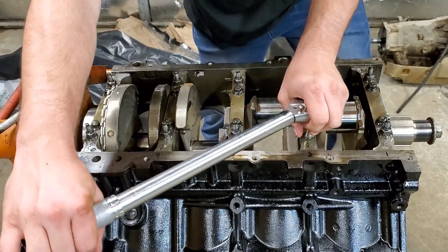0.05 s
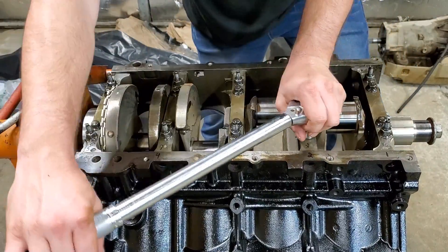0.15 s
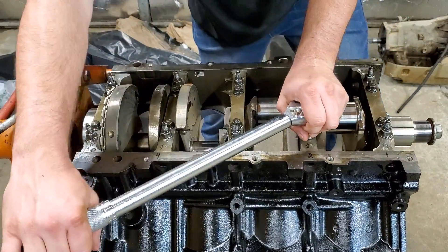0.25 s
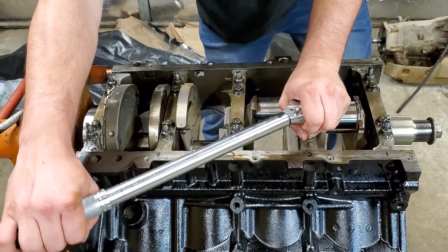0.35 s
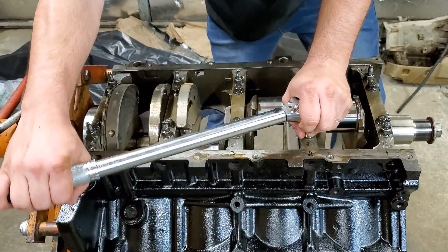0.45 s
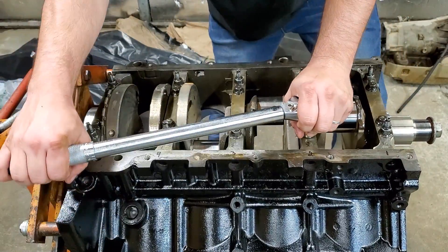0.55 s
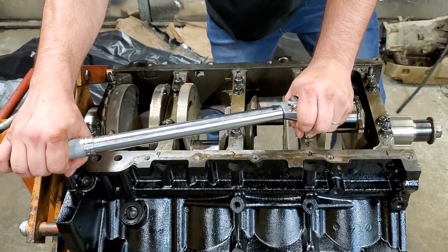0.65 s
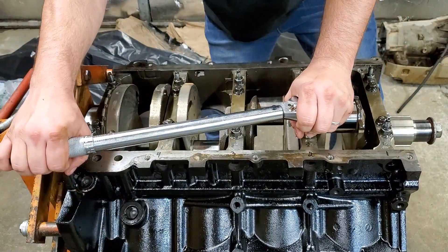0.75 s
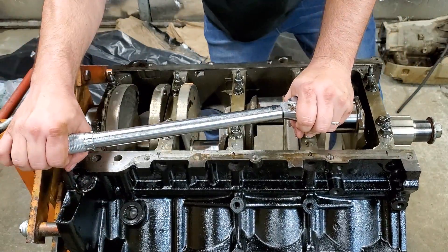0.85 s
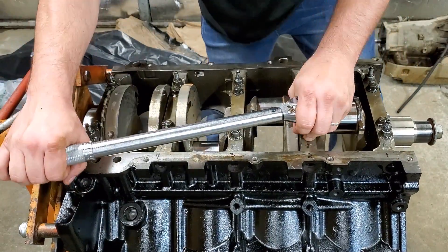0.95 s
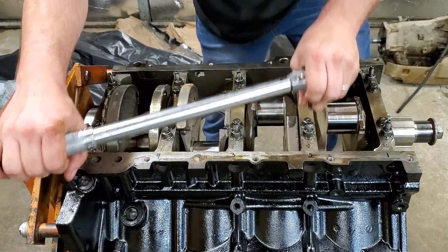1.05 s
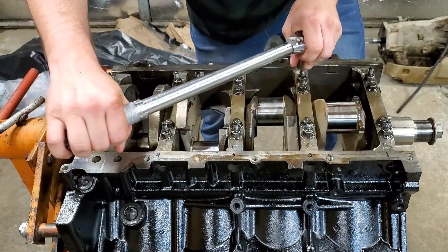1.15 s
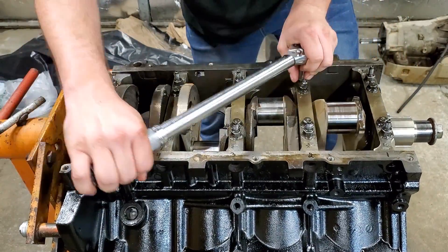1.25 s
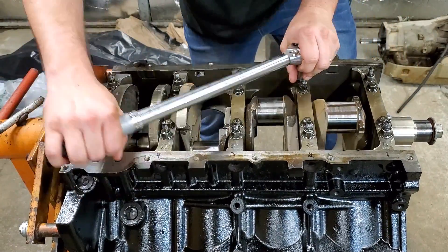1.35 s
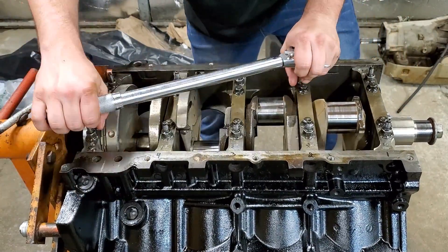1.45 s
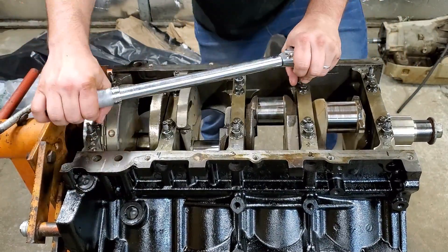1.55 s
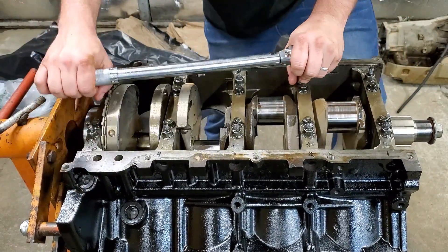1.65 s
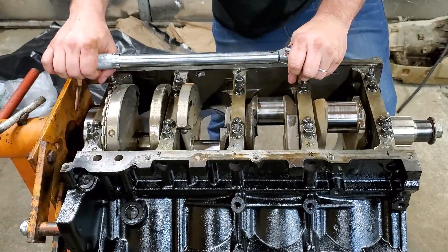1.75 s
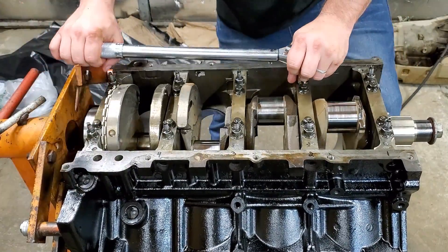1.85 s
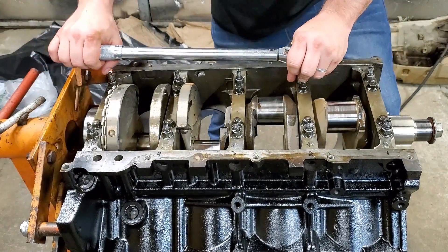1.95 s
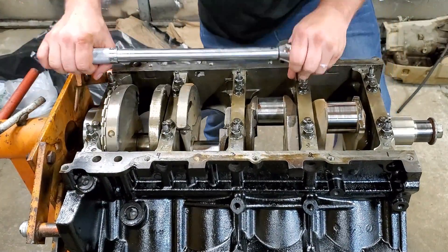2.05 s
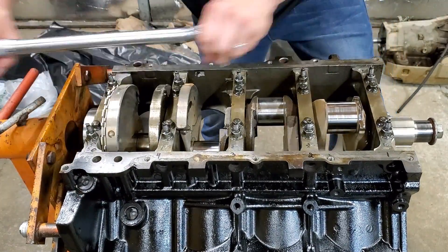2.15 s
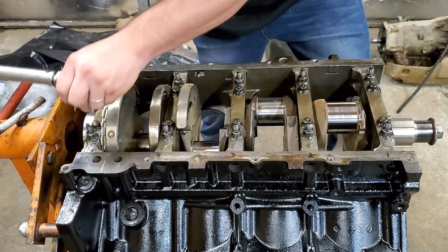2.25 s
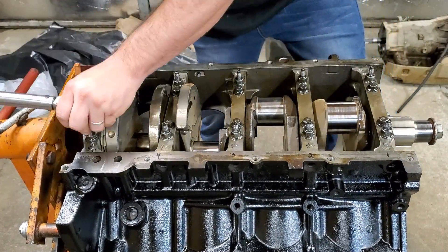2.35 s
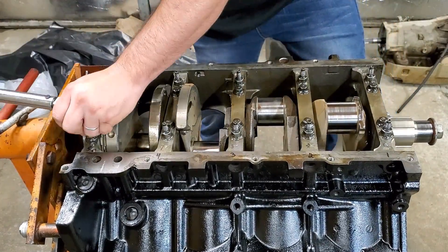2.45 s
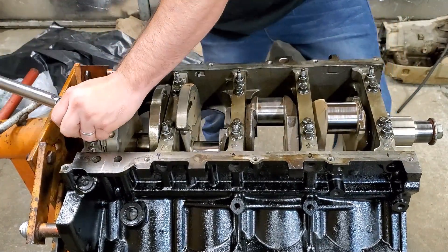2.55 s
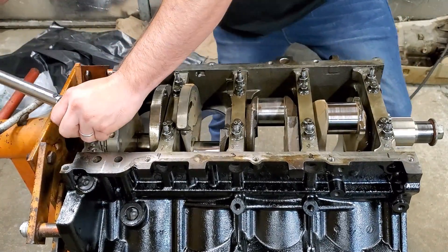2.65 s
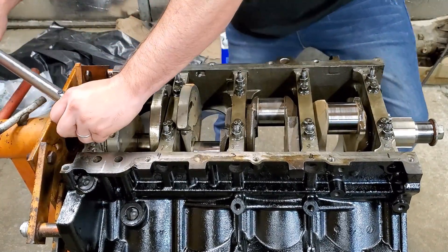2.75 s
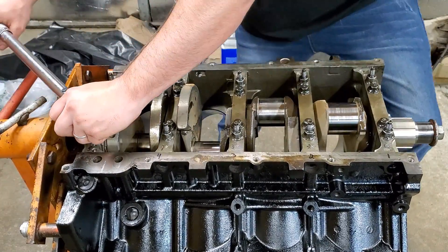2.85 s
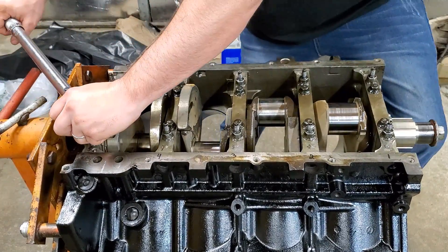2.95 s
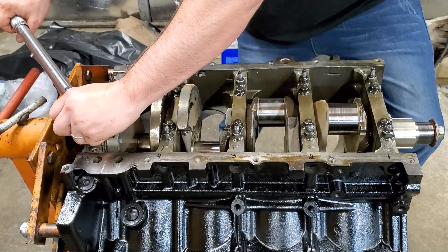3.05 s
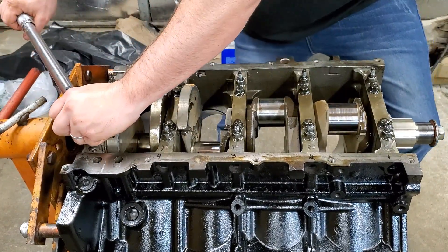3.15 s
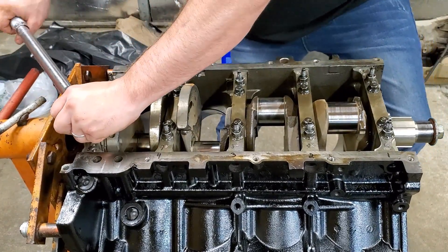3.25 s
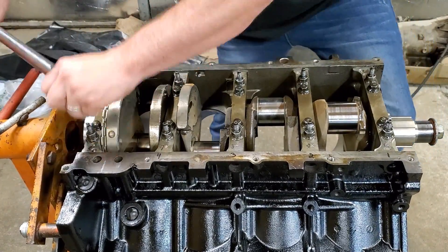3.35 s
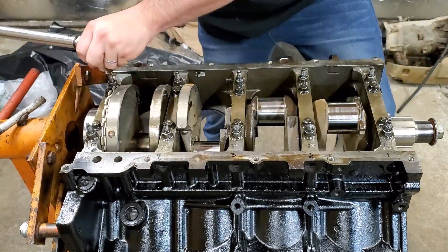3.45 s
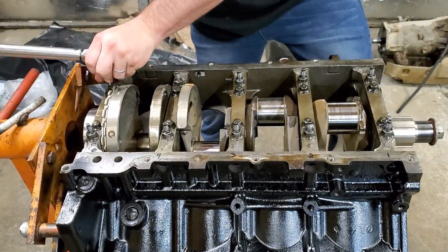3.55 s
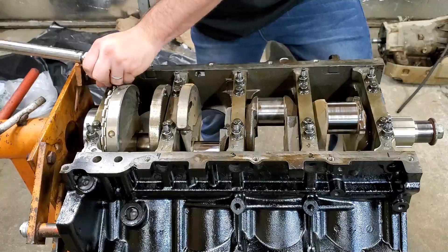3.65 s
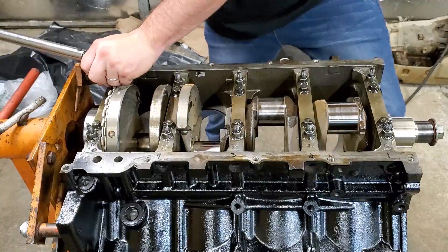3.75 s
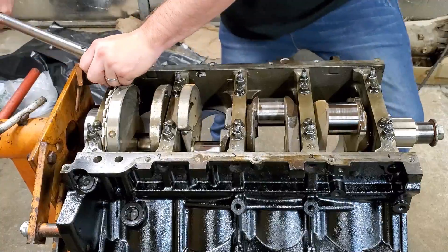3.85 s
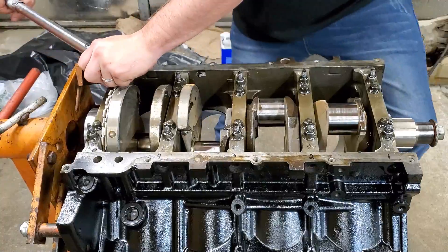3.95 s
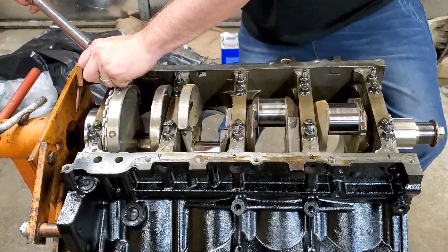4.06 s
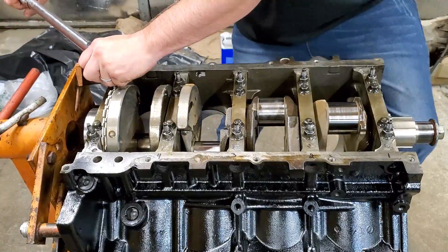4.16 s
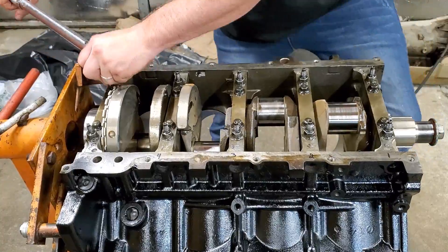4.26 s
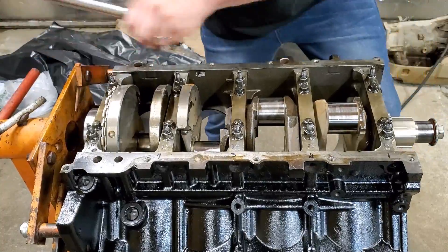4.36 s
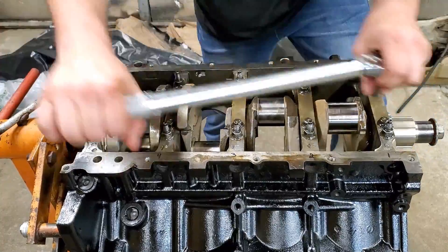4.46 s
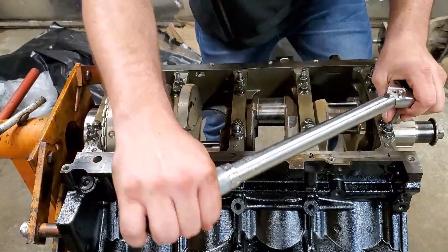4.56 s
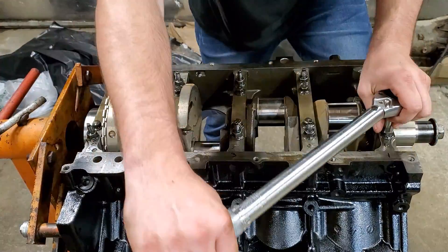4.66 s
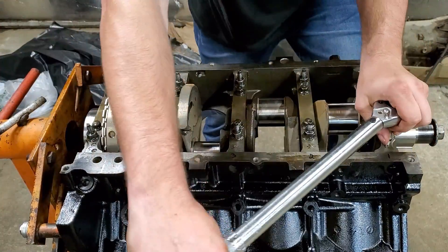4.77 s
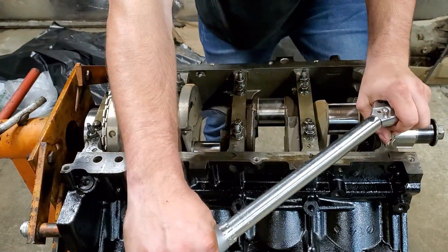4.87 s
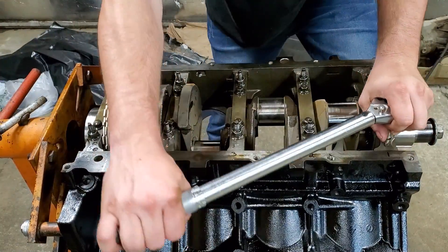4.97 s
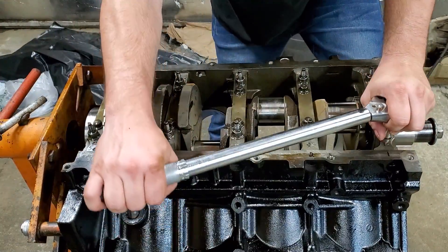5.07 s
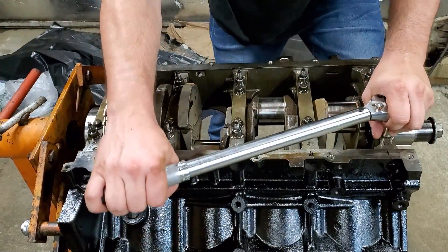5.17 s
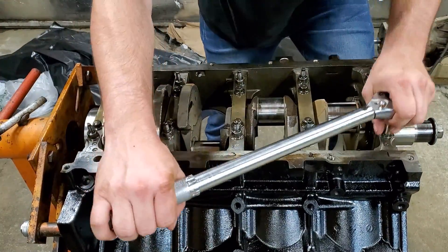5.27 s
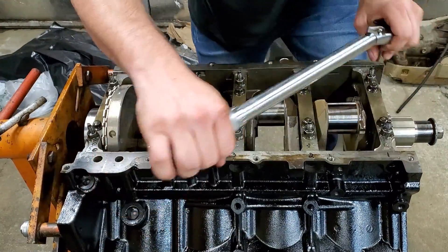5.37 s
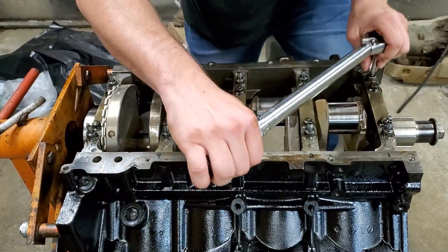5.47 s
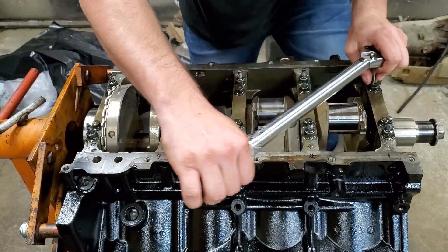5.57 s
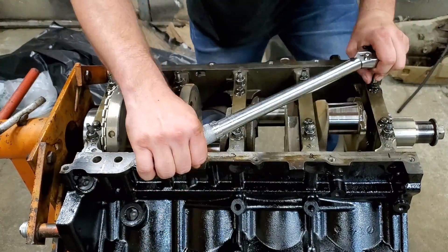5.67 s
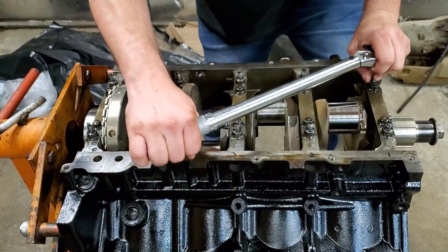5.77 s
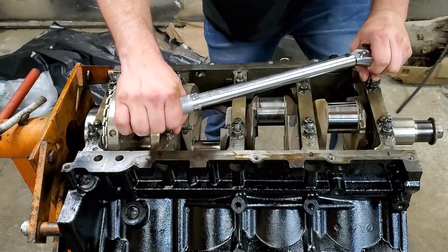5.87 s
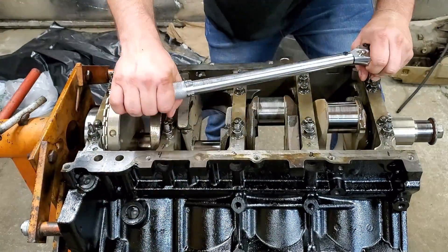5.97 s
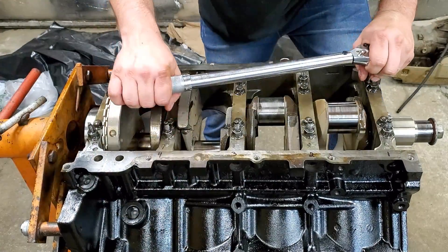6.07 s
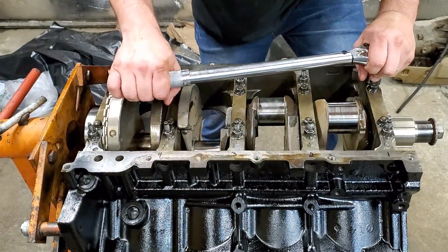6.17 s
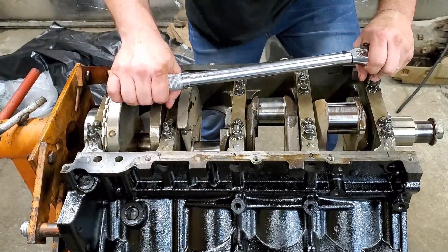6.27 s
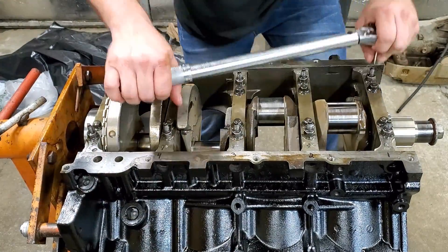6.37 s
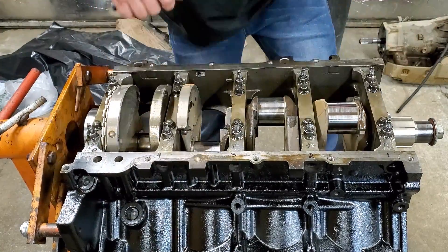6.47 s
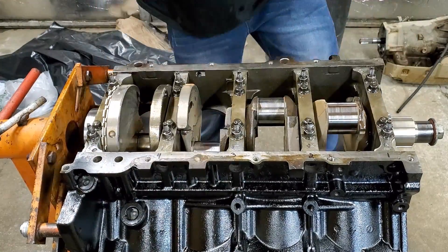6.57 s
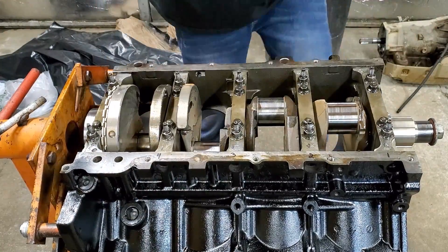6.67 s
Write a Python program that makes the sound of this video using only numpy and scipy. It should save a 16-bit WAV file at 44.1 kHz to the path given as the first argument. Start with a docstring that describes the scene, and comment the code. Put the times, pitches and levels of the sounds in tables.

```python
"""Torque wrench on an engine block

A click-type torque wrench checks six bolts, close by in a quiet garage. On each bolt it breaks over with
a loud click and ticks back as the pull eases: noise bursts through steel resonances, with a hum of decaying
sines for the tube. Then the socket is lifted off and rattles onto the next bolt in clusters of small strikes.
Dull block thuds are band-passed noise; hands and clothes rub faintly over a low room rumble, both shaped noise."""
import sys
import numpy as np
from scipy import signal
from scipy.fft import rfft, irfft
from scipy.io import wavfile
from scipy.ndimage import uniform_filter1d

SR = 44100
rng = np.random.default_rng(int(sys.argv[2]) if len(sys.argv) > 2 else 0)


def persist_wave(psi):
    """Save psi, clipped to +-1, as 16-bit WAV."""
    counts = np.round(np.clip(psi, -1, 1) * 32767).astype(np.int16)
    wavfile.write(sys.argv[1], SR, np.atleast_2d(counts).T)


N = 296352  # length [samples]

# Every source has two rows: the sum heard by both microphones, and unrelated reflections for their difference.


def gain_of(db):
    """Decibels to amplitude."""
    return 10 ** (np.asarray(db) / 20)


def evened(x):
    """Scales to rms 1."""
    return x / np.sqrt(np.mean(np.abs(x) ** 2) + 1e-20)


def read(points, hz):
    """Reads a table on a log-frequency axis."""
    f, value = np.transpose(points)
    return np.interp(np.log(hz + 1), np.log(f + 1), value)


def add(mix, s, sound):
    """Mixes a sound in at time s."""
    part = mix[:, max(round(s * SR), 0):][:, :sound.shape[-1]]
    part += sound[..., :part.shape[1]]


def noise(colour):
    """Two unrelated noises of one colour, rms 1 overall."""
    spectrum = rfft(rng.standard_normal((2, N)))
    hz = np.fft.rfftfreq(N, 1 / SR)
    return evened(irfft(spectrum * gain_of(read(colour, hz)), N))


def steel(colour, modes, s, body_db, treble_db, scatter_db=1.86, scatter_hz=140, size=12288):
    """Causal response of a steel part, unit power; each contact point favours other resonances."""
    # how freely the steel sings near 6.5 kHz as the bolts go by: (time [s], level [dB])
    singing = [(0.9, -8.5), (2.5, -0.5), (3.2, 13.5), (3.6, 2), (4.1, 3), (5.2, -3), (6.3, -6)]
    hz = np.fft.rfftfreq(size, 1 / SR)
    treble_shelf = read([(8800, 0), (12500, 1)], hz)
    body_shelf = read([(3800, 1), (5200, 0)], hz)
    db = read(colour, hz) + np.clip(treble_db, -8, 12) * treble_shelf + body_db * body_shelf
    # random ripple along the spectrum, one draw every scatter_hz
    db = db + scatter_db * np.interp(hz / scatter_hz, np.arange(256), rng.standard_normal(256))
    sung_mode = (6480, 230, np.interp(s, *np.transpose(singing)))
    for mode_hz, width, peak_db in [*modes, sung_mode]:
        db = db + peak_db / (1 + ((hz - mode_hz) / width) ** 2)
    log_gain = np.log(evened(gain_of(db)))
    mirrored = np.r_[log_gain, log_gain[-2:0:-1]]
    # minimum phase: the energy comes as early as this colour allows
    return np.exp(np.conj(signal.hilbert(mirrored)))[:len(hz)]


def strike(response, crack_db, ring_db, crack_s, clatter_db=-3, clatter_s=0.013, snap_db=3, size=12288):
    """Metal meets metal: a hard snap and crack, early reflections, then a dense ring with its own decay per band."""
    # how long the ring lasts among the block and the walls: (frequency [Hz], t60 [s])
    ring_t60 = [(300, 0.21), (1800, 0.16), (4000, 0.16), (7000, 0.14), (13000, 0.16), (18000, 0.18)]
    t = np.arange(size) / SR
    burst, clatter, wash = rng.standard_normal((3, 2, size))
    snap = gain_of(snap_db) * np.exp(-t / .0004)
    crack = rfft(burst * (np.exp(-t / crack_s) + snap))
    # a hard contact excites all pitches evenly
    crack = crack / np.sqrt(uniform_filter1d(np.abs(crack) ** 2, size=200))
    hz, age, z = signal.stft(wash, SR, nperseg=128)
    decay = gain_of(-60 * age / read(ring_t60, hz)[:, None])
    ring = signal.istft(z * decay, SR, nperseg=128)[1][:, :size]
    reflections = gain_of(clatter_db) * clatter * np.exp(-t / clatter_s)
    ring = (ring + reflections) * (1 - np.exp(-t / 0.00019))
    blow = gain_of(crack_db) * np.sqrt(crack_s * SR / 2) * crack + gain_of(ring_db) * rfft(ring)
    fade = np.clip(2 - 2.2 * t / t[-1], 0, 1)
    return irfft(blow * response, size) * fade


def pulls():
    """On each bolt the wrench breaks over loudly and ticks back as the pull eases."""
    # one break-over per bolt: (time [s], crack [dB], ring [dB], body tilt [dB], treble tilt [dB], tube [dB],
    # tube pitch factor set by the grip)
    releases = [(0.8984, -24.5, -33.5, -0.5, 4, -44.5, 1.05), (1.9298, -26.5, -31.5, -2, 3, -43, 1.014),
                (3.2231, -25, -31, 7.5, 6, -42.5, 1.02), (4.0947, -25.5, -29, 4.5, 7.5, -49, 1),
                (5.144, -24.5, -31.5, -0.5, 5, -44, 1.053), (6.264, -21.5, -34, -2.5, 1.5, -44.5, 1.012)]
    # the wrench ticks back: (time [s], crack level [dB], ring level [dB])
    eases = [(0.979, -39.5, -48.5), (2.0277, -46.5, -50.5), (3.3085, -34.5, -37.5), (4.1977, -39, -42.5),
             (5.237, -36.5, -45.5), (6.328, -41, -52.5)]
    # colours of the click and of the back tick: (frequency [Hz], level [dB])
    release_colour = [(150, -25.5), (500, -34), (900, -17), (1400, -15.5), (2700, -8), (4000, -15),
                      (5400, -5), (6400, 5), (8000, 1.5), (10000, -9), (13000, -1), (15500, -10.5),
                      (17000, -21)]
    reset_colour = [(150, -34), (500, -26.5), (900, -8), (1400, -14.5), (2600, -8), (4000, -8.5),
                    (6400, 0.5), (9000, -8), (12500, -2), (17000, -13)]
    # steel resonances of the wrench: (frequency [Hz], half width [Hz], level above the colour [dB])
    wrench_modes = [(1770, 160, 3), (2700, 160, 4), (3450, 70, 7), (6210, 70, 7), (6550, 30, 7),
                    (7250, 40, 5), (8740, 40, 4), (12280, 70, 3), (12732, 45, 7), (13200, 70, 7),
                    (14000, 120, 3)]
    # the back tick is a smaller break-over on the same bolt, duller and with a lower hum
    tick_body_db, tick_treble_db, tick_tube_db, tick_pitch = 2, -9.5, -54, 0.97
    tick_tilt_share = 0.25  # how much of the bolt's body tilt the back tick keeps
    out = np.zeros((2, N))
    for release, tick in zip(releases, eases):
        s, crack_db, ring_db, body_db, treble_db, tube_db, pitch = release
        response = steel(release_colour, wrench_modes, s, body_db, treble_db)
        hum = gain_of(tube_db) * tube(pitch)
        out += wrench(s, crack_db, ring_db, response, hum, crack_s=0.0036, slip_db=-13.5)
        tick_body = tick_tilt_share * body_db + tick_body_db
        response = steel(reset_colour, wrench_modes, s, tick_body, treble_db + tick_treble_db)
        hum = gain_of(tick_tube_db) * tube(pitch * tick_pitch)
        out += wrench(*tick, response, hum, crack_s=0.005, slip_db=-25.0)
    return out


def wrench(s, crack_db, ring_db, response, hum, crack_s, slip_db, slip_s=0.0012):
    """The pawl starts to slip, then the head snaps against the tube and sets it humming."""
    out = np.zeros((2, N))
    add(out, s - slip_s, strike(response, ring_db + slip_db, ring_db + slip_db, crack_s))
    add(out, s, strike(response, crack_db, ring_db, crack_s))
    add(out, s, hum)
    return out


def tube(pitch, sag=0.18, sag_s=0.0036):
    """The hollow handle swells into a short hum near 1 kHz that sags as the load lets go."""
    # modes of the handle: (frequency [Hz] before the grip's factor, level [dB], rise [s], t60 [s])
    tube_modes = [(1042, 12.5, 0.013, 0.098), (963, -0.5, 0.0058, 0.15), (1124.3, -32, 0.024, 0.24),
                  (1010, -15, 0.0035, 0.31)]
    t = np.arange(SR // 2) / SR
    hum = np.zeros((2, len(t)))
    sagging_time = t - sag * sag_s * np.exp(-t / sag_s)  # starts sharp by the share sag, then settles
    for hz, db, rise, t60 in tube_modes:
        mode_hz = hz * pitch * (1 + 0.0016 * rng.standard_normal())
        turns = mode_hz * sagging_time + rng.random((2, 1))
        swell = 1 - np.exp(-(t / rise) ** 2)
        decay = np.exp(-np.log(1000) * t / t60)
        hum += gain_of(db) * swell * decay * np.sin(2 * np.pi * turns)
    return hum


def socket():
    """The socket clinks its way onto each bolt, and shifts on it with more of a scrape once the pull is over."""
    # the socket meets a bolt head: (time [s], strength [dB], body tilt [dB], treble tilt [dB],
    # length of the rattle [s], rattle against the strength [dB])
    clinks = [(0.001, -46.5, -2.5, 4.5, .008, -7), (0.102, -51.5, -2, 1.5, 0.0086, -1),
              (0.233, -39.5, 4.5, 0, 0.0098, -23), (1.248, -41.5, -3.5, 6.5, .012, -13),
              (1.272, -37, -1.5, 5, 0.011, -3), (1.452, -28.5, -1.5, -2, 0.0051, -13.5),
              (2.3729, -38, -3.5, 3.5, 0.0092, -11.5), (2.409, -44, -0.5, 1, 0.0036, -4),
              (2.422, -31.5, 1.5, 9.5, 0.013, -3), (2.543, -22.5, 1.5, -1, .007, -9),
              (3.549, -42.5, -3.5, 7, 0.017, 4), (3.587, -35.5, 0, -9, 0.0063, -12),
              (3.603, -38, 4, 7, 0.0073, -10.5), (3.6638, -29, 2.5, 1.5, 0.0078, -7),
              (3.738, -47.5, 7, 12, 0.015, -0.5), (4.619, -45.5, 9.5, 7.5, 0.0086, -13.5),
              (4.67, -35, -5.5, -1, 0.038, -1.5), (4.716, -29.5, -5, 9, .009, -14),
              (4.766, -39.5, -2, 0, 0.0034, -7), (4.775, -31, 3, 4, 0.0067, -23),
              (4.787, -38, -2, -1.5, .006, -18), (5.515, -42.5, -0.5, 0.5, 0.03, -0.5),
              (5.551, -32, -11.5, -3, 0.015, -0.5), (5.563, -31, -3.5, 8.5, 0.016, -7.5),
              (5.597, -30.5, 1.5, 7.5, 0.0049, -13), (5.69, -51, -5.5, 4, 0.011, 1)]
    # the socket drops slack, softly, when the load comes off: (time [s], level [dB], treble tilt [dB])
    slacks = [(1.088, -53.5, -2), (3.395, -49, 1), (4.323, -51.5, -5), (5.342, -50.5, -4),
              (6.413, -50.5, 0)]
    out = np.zeros((2, N))
    for row in clinks:
        out += clink(*row, scrape_db=-19.5, scrape_s=0.0038)
    for s, db, treble_db in slacks:
        out += clink(s, db, body_db=-0.5, treble_db=treble_db, rattle_s=0.012, rattle_db=-5.5,
                     scrape_db=-11, scrape_s=0.0029)
    return out


def clink(s, db, body_db, treble_db, rattle_s, rattle_db, scrape_db, scrape_s,
          ring_db=-8, crack_s=0.0038, bounce_ring_db=-9, count=2):
    """The loose socket scrapes for an instant, hits the bolt head, rattles on in uneven bounces and settles."""
    # colour of the socket: (frequency [Hz], level [dB])
    clink_colour = [(150, -40), (500, -24.5), (1000, -18), (2000, -11), (2900, -15), (3500, -7.5),
                    (4600, -8), (6200, 0.5), (7800, 1), (10000, -8.5), (13000, -8), (15500, -8),
                    (18000, -13.5)]
    # steel resonances of the socket: (frequency [Hz], half width [Hz], level above the colour [dB])
    socket_modes = [(1064, 34, 10), (3420, 99, 3.5), (5370, 52, 3.5), (6200, 110, 5.4), (7600, 49, 1.8),
                    (7700, 40, 4.1), (9300, 49, 7.5), (10660, 45, 6.2), (11080, 400, 6), (13070, 59, 1),
                    (15560, 31, 4)]
    settle_s, settle_db = 0.052, -29  # typical delay until it rocks back and touches once more, faintly
    out = np.zeros((2, N))
    response = steel(clink_colour, socket_modes, s, body_db, treble_db)
    add(out, s - scrape_s, strike(response, db + scrape_db, db + scrape_db, crack_s))
    add(out, s, strike(response, db, db + ring_db, crack_s))
    bounce_db = db + rattle_db
    for late in (np.arange(count) + rng.uniform(.5, 1, count)) / count:
        add(out, s + late * rattle_s, strike(response, bounce_db, bounce_db + bounce_ring_db, crack_s / 2))
    settled = s + settle_s * rng.uniform(0.61, 1.3)
    add(out, settled, strike(response, db + settle_db, db + settle_db, crack_s))
    return out


def knocks():
    """The heavy block and its stand answer some blows with a dull, damped thud of band-passed noise."""
    # thuds: (time [s], level [dB], frequency [Hz], half width [Hz], rise [s], t60 [s])
    thuds = [(2.548, -53.5, 146.6, 11, 0.025, 0.28), (3.669, -49.5, 147, 23, 0.031, 0.23),
             (4.345, -58, 940, 580, 0.00062, 0.074), (5.1424, -35.5, 604, 460, 0.00028, 0.035),
             (5.144, -64, 258, 230, 0.0022, 0.039)]
    out, t = np.zeros((2, N)), np.arange(SR // 2) / SR
    for s, db, hz, width, rise, t60 in thuds:
        push = (1 - np.exp(-t / rise)) * np.exp(-np.log(1000) * t / t60)
        edges = [max(hz - width, hz / 4), hz + width]
        band = signal.butter(2, edges, "band", fs=SR, output="sos")
        thud = signal.sosfilt(band, push * rng.standard_normal((2, len(t))))
        # the thud carries the energy of the push, whatever its bandwidth
        thud *= np.linalg.norm(push) / np.linalg.norm(thud, axis=1, keepdims=True)
        add(out, s, gain_of(db) * thud)
    return out


def rubbing(grain_db, size=1300):
    """Skin and cloth slide in uneven little spurts that swell and fade with each move of the hands."""
    # a hand slides or changes place: (time of the height [s], level [dB], half length [s])
    moves = [(0.5, -80, 0.082), (1.62, -77, .13), (3.782, -75, 0.091), (4.37, -75, 0.046),
             (4.544, -73.5, 0.026), (4.708, -65, 0.092), (5.038, -77, .08), (5.368, -70.5, .05),
             (5.536, -66, 0.086), (5.79, -72, 0.094), (6.39, -72, 0.066)]
    # colour of the rubbing: (frequency [Hz], level [dB])
    rub_colour = [(150, -15.5), (450, -7), (800, -10), (1200, 1.5), (1420, -0.5), (1680, -1), (2200, -15.5),
                  (3400, -23), (3900, -11.5), (4400, -2), (5000, -15.5), (8000, -28.5), (17000, -38.5)]
    t = np.arange(N) / SR
    power = gain_of(-83) ** 2  # clothes keep rustling between moves
    for s, db, half_s in moves:
        power = power + gain_of(db) ** 2 * np.exp(-((t - s) / half_s) ** 2)
    grain = evened(uniform_filter1d(rng.standard_normal(N), size))
    return noise(rub_colour) * np.sqrt(power) * gain_of(grain_db * grain)


def garage(level_db, waver_db=2.0, size=5000):
    """Room noise that swells gently: a rumble below 400 Hz wavers a few times a second under a faint hiss."""
    # swell of the room noise: (time [s], level [dB])
    swell = [(0, -0.5), (4.3, -1.4), (5.1, 1.6), (6.7, 0)]
    # colour of the room: (frequency [Hz], level [dB])
    room_colour = [(25, -9), (45, -19), (62, -3.5), (100, 0), (165, 4), (260, 3.5), (340, -6), (480, -9.5),
                   (1000, -15), (1400, -17.5), (3000, -21.5), (8000, -23), (11500, -19.5), (17000, -24.5)]
    swell_db = np.interp(np.arange(N) / SR, *np.transpose(swell))
    air = gain_of(level_db + swell_db) * noise(room_colour)
    low = signal.sosfiltfilt(signal.butter(2, 400, fs=SR, output="sos"), air)
    waver = evened(uniform_filter1d(rng.standard_normal(N), size))
    return air - low + low * gain_of(waver_db * waver)


def two_microphones(x, direct, late_s=0.0012):
    """The microphones hear one sum; their difference is part one sideways echo, part unrelated reflections."""
    # difference between the microphones against their sum: (frequency [Hz], level [dB])
    side_db = [(100, -11), (170, -21), (300, -3.5), (1000, -9), (2700, -13.5), (4300, -5), (5500, -2.5),
               (6600, -1), (7700, -9), (9700, -6.5), (10900, -22.5), (17000, -23)]
    mid, diffuse = rfft(x)
    hz, direct = np.fft.rfftfreq(N, 1 / SR), np.clip(direct, 0, 1)
    sideways_echo = mid * np.exp(-2j * np.pi * hz * late_s)
    side = gain_of(read(side_db, hz)) * (direct * sideways_echo + np.sqrt(1 - direct ** 2) * diffuse)
    return irfft(np.array([mid + side, mid - side]), N)


def scene():
    """Wrench, socket and hands over the garage floor noise."""
    sound = pulls() + socket() + knocks() + rubbing(grain_db=3.5) + garage(level_db=-69.5)
    balance_db = [[.3], [-.3]]  # left slightly louder than right
    return two_microphones(sound, direct=0.12) * gain_of(balance_db)


def record(dry, echo=0.39):
    """A reflection 1.1 ms late combs everything that reaches the microphones; then the band limits."""
    lag = 50  # [samples]
    combed = dry + echo * np.pad(dry, ((0, 0), (lag, 0)))[:, :N]
    combed = signal.sosfilt(signal.butter(4, 48, "high", fs=SR, output="sos"), combed)
    edge_hz = 18150  # top of the band
    lowpass = signal.firwin(401, edge_hz, window=("kaiser", 8), fs=SR)
    return signal.oaconvolve(combed, lowpass[None], "same")


dry = scene()
out = record(dry)
persist_wave(out)
```